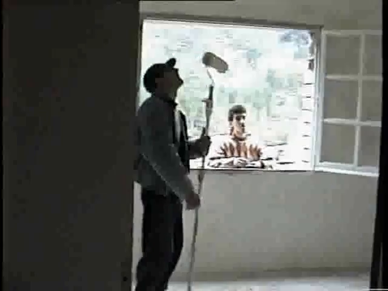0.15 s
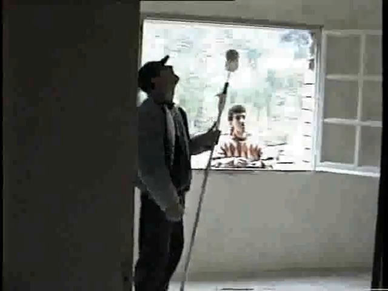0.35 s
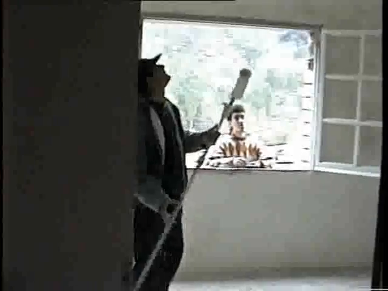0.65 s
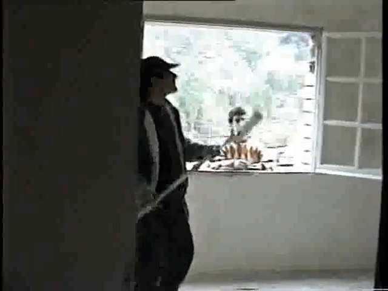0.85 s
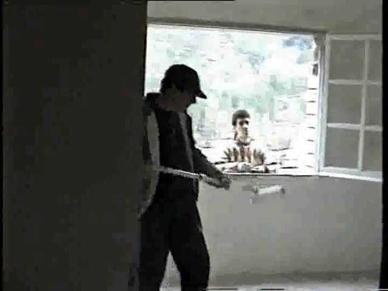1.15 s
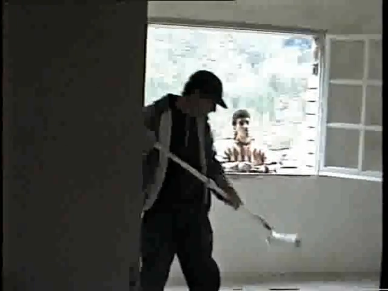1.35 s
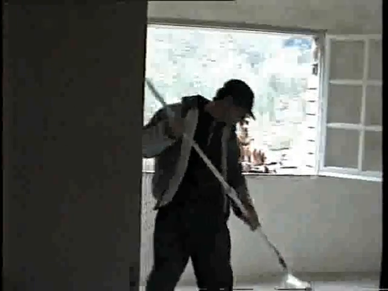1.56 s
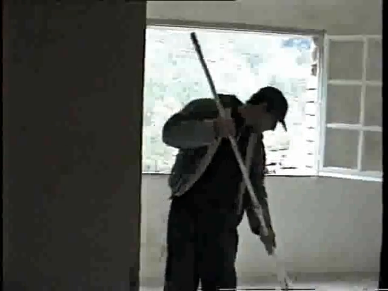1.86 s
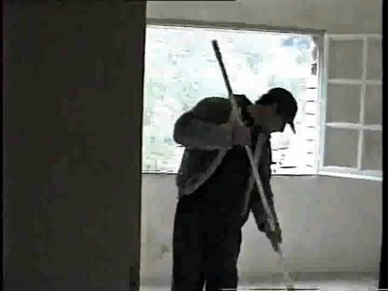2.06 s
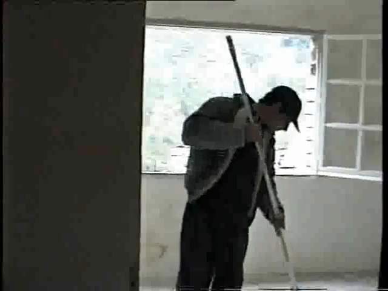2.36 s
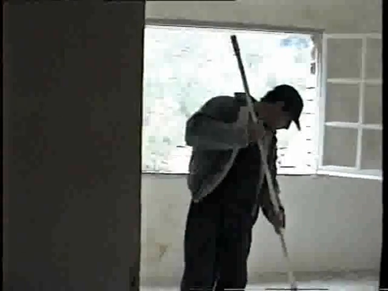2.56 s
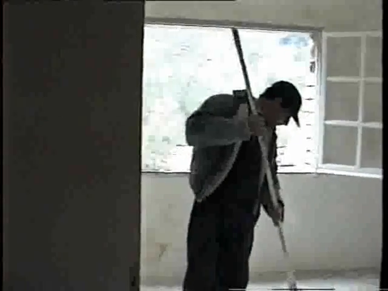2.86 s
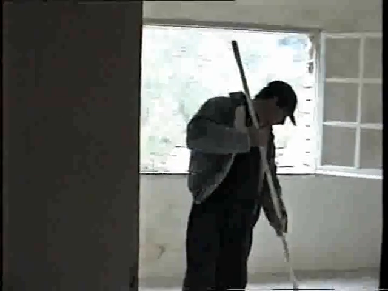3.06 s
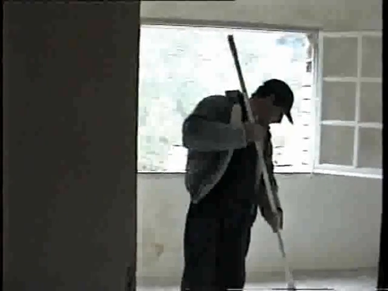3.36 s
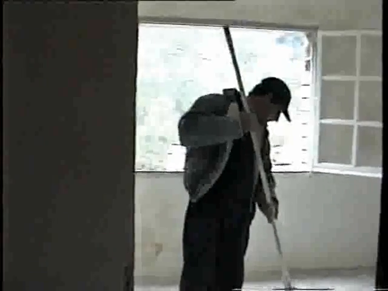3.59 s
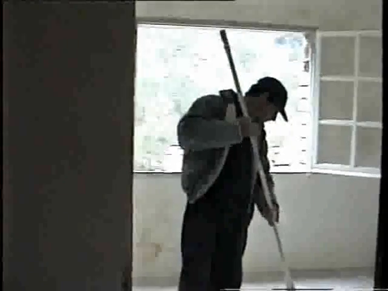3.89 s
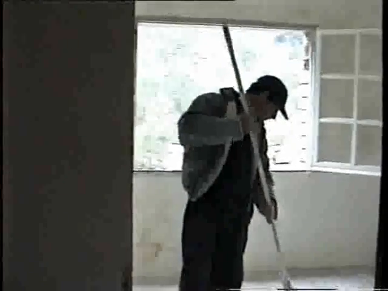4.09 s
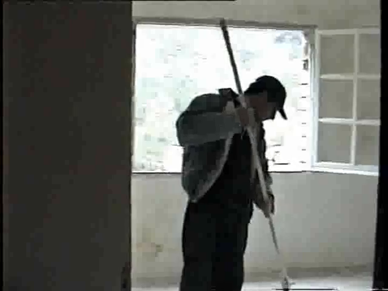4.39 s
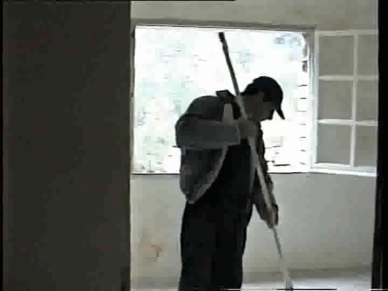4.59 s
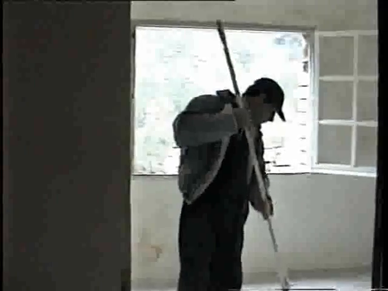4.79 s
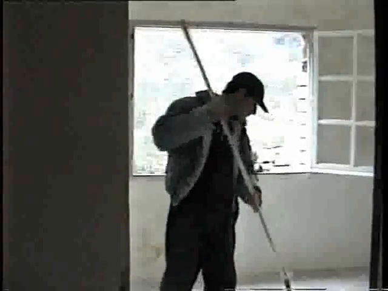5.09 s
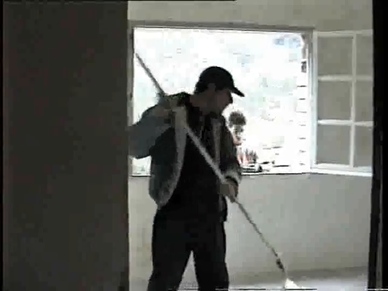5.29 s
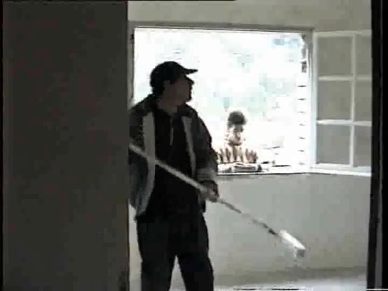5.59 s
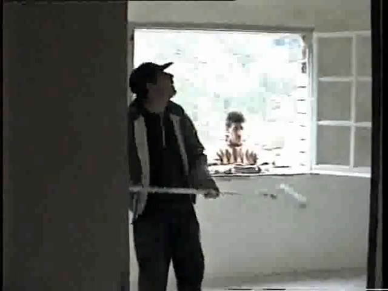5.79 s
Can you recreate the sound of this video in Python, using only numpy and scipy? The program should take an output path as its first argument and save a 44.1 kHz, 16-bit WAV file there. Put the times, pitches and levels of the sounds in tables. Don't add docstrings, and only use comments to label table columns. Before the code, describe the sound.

In a bare, echoing room, a wet paint roller knocks and scrapes a tub, then rolls in loud, hissing, drumming strokes.

```python
import sys
import numpy as np
from scipy import signal
from scipy.fft import rfft, irfft, next_fast_len
from scipy.io import wavfile
from scipy.ndimage import uniform_filter1d, map_coordinates

SR = 44100
rng = np.random.default_rng(int(sys.argv[2]) if len(sys.argv) > 2 else 0)


def undo_db(level):
    steps = np.asarray(level, float) / 20
    return 10 ** steps


def inscribe(sig):
    pcm = np.round(np.clip(np.atleast_2d(sig).T, -1, 1) * 32767)
    wavfile.write(sys.argv[1], SR, pcm.astype(np.int16))


N = 261954

# (frequency [Hz], t60 [s])
ROOM_DECAY = [(150, 1.63), (500, 1.05), (1500, 0.9), (3000, 0.7), (6000, 0.51), (12000, 0.34)]


def unit(x):
    return x / np.sqrt(np.mean(x ** 2) + 1e-20)


def along(points, hz):
    f, v = np.transpose(points)
    return np.interp(np.log(hz + 1), np.log(f + 1), v)


def wobble(rate):
    knots = rng.standard_normal(int(N * rate / SR) + 4)
    return map_coordinates(knots, [np.arange(N) * rate / SR])


def filtered(x, response):
    m = next_fast_len(N + SR // 2)
    return irfft(rfft(x, m) * response(np.fft.rfftfreq(m, 1 / SR)), m)[..., :N]


def colour(points):
    return lambda hz: undo_db(along([(points[0][0] / 2, -120)] + points, hz))


def roller():
    # (frequency [Hz], level [dB per Hz])
    rumble_colour = [(60, -60), (130, -12), (180, -16), (235, -3), (330, -6.5), (420, -6.5), (600, -49.5)]
    scrape_colour = [(250, -138), (400, -2.5), (600, 1.5), (1000, 2), (1600, -1), (2200, -8), (3400, -15),
                     (4500, -30), (7000, -48)]
    paint_colour = [(1200, 2), (2200, 2), (3500, 1), (5000, 0.5), (8000, 1), (10500, -2.5), (12500, -8.5),
                    (14000, -16), (15000, -25)]
    thump, tub, fizz = effort(t60=[.15, .055, .05], rise=0.0042)
    tub = tub * undo_db(3.59 * wobble(30))
    ring = ringing()
    share = 1 / np.sqrt(1 + ring ** 2)
    scrape = tub * share * unit(filtered(grains(spread_db=2.0), colour(scrape_colour)))
    walls = tub * share * ring * unit(filtered(grains(spread_db=0.5), tub_modes))
    low = thump * undo_db(2.0 * wobble(14)) * unit(filtered(grains(spread_db=2.5), colour(rumble_colour)))
    threads = fizz * undo_db(2.84 * wobble(60)) * unit(filtered(grains(spread_db=2), colour(paint_colour)))
    hiss = 0.62 * scrape + 0.71 * threads
    drumming = 0.59 * scrape + 0.42 * threads + walls + low
    return hiss, drumming


def effort(t60, rise):
    # (start [s], length [s], tub at landing [dB], tub at lift [dB], paint fizz at full speed [dB])
    rolls = [
        (2.992, .33, -11, -9.5, -11),
        (3.749, .33, -25, -12.5, -12),
        (4.38, 0.3, -11.5, -10.5, -12),
        (5.15, .25, -17, -15, -10),
    ]
    # (start [s], length [s], tub at landing [dB], tub at lift [dB], fizz [dB])
    drags = [(0, .1, -18, -37, -60), (.72, .12, -39, -50, -53), (0.853, 0.076, -27.5, -28.5, -44),
             (.98, .2, -33.5, -32, -39.5), (1.3, 0.24, -36, -28, -41.5), (1.211, .13, -18, -30, -47),
             (1.492, 0.24, -20, -41.5, -27), (1.722, 0.32, -37, -43.5, -45), (2, .12, -31.5, -18, -32),
             (2.122, .26, -7, -12.5, -19), (2.408, 0.23, -22, -25, -45), (2.615, .25, -26, -32.5, -40.5),
             (5.666, 0.24, -8.5, -12, -14)]
    # (time [s], thump [dB], tub [dB], snap [dB])
    knocks = [(0.0, -6.5, -40.7, -1.5), (0.09, -13.5, -50.8, -69.7), (0.228, -39, -19, -20),
              (0.425, -24, -16, -40), (0.712, -36, -19, -30), (0.855, -26, -20, -32),
              (0.885, -21, -31, -68.6), (1.04, -28, -20, -34), (1.22, -25, -17, -43),
              (1.254, -27, -19, -44), (1.501, -11.5, -30, -13.5), (2.011, -19.5, -15, -25),
              (2.078, -34.6, -23, -70.0), (2.121, -68.0, 3, -1.5), (2.613, -18, -6, -15),
              (2.999, -25, -1, -11.5), (3.749, -70.0, -17.5, -49), (4.375, -30, -3.5, -8),
              (5.128, -18, 0.5, -11.5), (5.187, -24, 2.5, -8.5), (1.14, -17, -33, -50),
              (1.33, -18.5, -40, -50), (2.43, -21.5, -40, -60), (5.646, -40, -3.5, -45),
              (5.674, -69.9, -12, -2)]
    power = np.zeros((3, N))
    for row in rolls:
        softer_db = max(row[3] - row[2], 0)
        late, tub, fizz = stroke(row, peak=0.59, start_db=16 + 1.24 * softer_db, end_db=13.5,
                                 sag_db=9, lag=0.19)
        add(power, row[0], np.array([undo_db(-13.5) * late, tub, fizz]))
    for row in drags:
        _, tub, fizz = stroke(row, peak=0.2, start_db=5, end_db=19.5, sag_db=0, lag=0)
        add(power, row[0], np.array([undo_db(-20.5) * tub, tub, fizz]))
    t = np.arange(SR // 4) / SR
    burst = undo_db(-60 * t / np.array(t60)[:, None]) * (1 - np.exp(-t / rise))
    for s, *dbs in knocks:
        add(power, s, undo_db(np.array(dbs)[:, None]) * burst)
    return np.sqrt(power)


def stroke(row, peak, start_db, end_db, sag_db, lag):
    attack_s, lift_db_per_s, trail_s = 0.0091, 325, 0.25
    _, length, land_db, lift_db, fizz_db = row
    t = np.arange(round((length + trail_s) * SR)) / SR
    u = np.clip(t / length, 0, 1)
    gate = np.clip(t / attack_s, 0, 1) * undo_db(-lift_db_per_s * np.maximum(t - length, 0))

    def swell(p):
        rising = -start_db * (1 - u / p) ** 2
        falling = -end_db * ((u - p) / (1 - p)) ** 2
        return np.where(u < p, rising, falling)

    tub = land_db + (lift_db - land_db) * u - sag_db * np.sin(np.pi * u) ** 2
    return gate * undo_db([lift_db + swell(peak + lag), tub, fizz_db + swell(peak)])


def add(power, s, envelopes):
    spot = power[:, max(round(s * SR), 0):][:, :envelopes.shape[1]]
    spot += envelopes[:, :spot.shape[1]] ** 2


def ringing():
    touch_s, soak_s = 1.15, 1.95
    away_db, dry_db, wet_db, damp_db_per_s = -9, 0.5, -8.5, 7
    t = np.arange(N) / SR
    soaked = np.maximum(dry_db - damp_db_per_s * np.maximum(t - soak_s, 0), wet_db)
    return undo_db(away_db + (soaked - away_db) * np.clip((t - touch_s) / 0.11, 0, 1))


def tub_modes(f):
    # (centre [Hz], width [Hz], level [dB])
    modes = [(459.5, 24.6, 7), (800, 86, 2), (1008, 157, 1.5), (1127, 75, -8), (1537, 15, 6),
             (2372, 47, -4.5), (3250, 230, -14)]
    total = 0
    for k, (centre, width, db) in enumerate(modes):
        damping = 1j * f * width
        total = total + (-1) ** k * undo_db(db) * damping / (centre * centre - f * f + damping)
    return total


def grains(spread_db):
    return rng.standard_normal(N) * undo_db(spread_db * rng.exponential(size=N))


def notes():
    # (time [s], frequency [Hz], level [dB], t60 [s])
    struck = [(0.028, 245, -10, 0.26), (0.0, 200, -11.5, 0.31), (0.079, 269, -6.5, 0.066),
              (1.26, 610, -16, 0.13), (2.14, 1020, 0.5, 0.1), (2.2, 1535, -8, 0.35),
              (.228, 2000, -16.5, 0.029), (.228, 2000, -24, 0.044), (.858, 790, -23, 0.092),
              (.856, 500, -20, 0.089), (.885, 438, -10.5, 0.058), (1.24, 1570, -15, 0.12),
              (1.23, 430, -19, 0.63), (1.25, 2475, -22.5, 0.082), (1.5, 1037, -14, 0.074),
              (1.55, 678, -18.5, 0.15), (2.08, 460, -16, 0.12), (2.39, 131, -24, 0.22),
              (3.02, 960, -11, 0.22), (3.301, 936, -12, 0.24), (3.3, 570, -9, 0.097),
              (4.39, 500, -13, 0.28), (4.63, 860, -13.5, 0.43), (4.63, 1324, -10.5, 0.18),
              (5.21, 530.3, -4.5, 0.14), (5.14, 630, -14, 0.11), (5.19, 790, -9.5, 0.093),
              (5.33, 980, -8, 0.17)]
    out, t = np.zeros(N + SR), np.arange(SR // 2) / SR
    for s, hz, db, t60 in struck:
        phase = 2 * np.pi * hz * t + np.cumsum(rng.normal(0, 0.047, len(t)))
        envelope = undo_db(db - 60 * t / t60) * (1 - np.exp(-t / 0.0019))
        out[max(round(s * SR), 0):][:len(t)] += envelope * np.sin(phase)
    return out[:N]


def clank():
    # (frequency [Hz], level [dB], t60 [s])
    steel = [(1800, -6, 0.73), (1980, -2.5, 1), (2482, -10, 1), (3180, -3.5, 0.57), (4170, -5, 0.6),
             (4840, -7, 0.5), (5100, -6, 0.37), (5850, -3, 0.45), (8050, -5, 0.35), (7130, -8, 0.3),
             (8920, -10, 0.28), (10070, -28, .2), (11000, -18, .3), (11400, -14, .25)]
    # (time [s], level [dB], tilt [dB per kHz])
    clanks = [
        (0, -24.5, 0.5),
        (.228, -37, 0),
        (1.254, -36, -1.5),
    ]
    out, t = np.zeros(N + SR), np.arange(SR) / SR
    for s, db, tilt_db in clanks:
        for hz, level_db, t60 in steel:
            waver = np.cumsum(rng.normal(0, 0.077, len(t)))
            fading = undo_db(db + level_db + tilt_db * hz / 1000 - 60 * t / t60)
            out[max(round(s * SR), 0):][:len(t)] += fading * np.sin(2 * np.pi * hz * t + waver)
    return out[:N]


def room(x, gap=.006, count=24):
    hz, t, z = signal.stft(rng.standard_normal((count + 1, 3 * SR // 2)), SR, nperseg=256)
    t60 = along(ROOM_DECAY, hz)[:, None]
    tails = signal.istft(z * undo_db(-60 * t / t60) / np.sqrt(t60), SR, nperseg=256)[1]
    tails = np.pad(tails / np.linalg.norm(tails[0]), ((0, 0), (round(gap * SR), 0)))
    step = N // count + 1
    fade = np.sin(np.pi * np.arange(2 * step) / (2 * step))
    padded, out = np.pad(x, (step, 2 * step)), np.zeros(N + 3 * step + 2 * SR)
    for k, tail in enumerate(tails):
        echo = signal.fftconvolve(padded[k * step:][:2 * step] * fade, tail)
        out[k * step:][:len(echo)] += echo
    return out[step:step + N]


def wash(x, gap=.008):
    hz, t, z = signal.stft(x, SR, nperseg=256)
    keeps = undo_db(-120 * t[1] / along(ROOM_DECAY, hz))
    energy = [signal.lfilter([1 - keep], [1, -keep], row) for keep, row in zip(keeps, np.abs(z) ** 2)]
    fresh = signal.stft(unit(rng.standard_normal(N)), SR, nperseg=256)[2]
    fresh = fresh / np.sqrt(np.mean(np.abs(fresh) ** 2))
    echo = signal.istft(np.sqrt(energy) * fresh, SR, nperseg=256)[1]
    return np.pad(echo, (round(gap * SR), 0))[:N]


def air():
    # (frequency [Hz], level [dB per Hz])
    air_colour = [(25, 11), (60, 2), (95, -9), (125, 6), (160, -16), (240, -5.5), (500, 5), (1200, -6.5),
                  (2500, -8.5), (4000, -17), (9000, -21.5), (14500, -36)]
    sway = undo_db(-38.5 + 2.7 * wobble(4.15))
    return sway * unit(filtered(rng.standard_normal(N), colour(air_colour)))


def scene():
    hiss, drumming = roller()
    tones = notes()
    direct = undo_db(-10.0) * (hiss + drumming) + undo_db(-2.5) * tones
    echoes = undo_db(-1.96) * (wash(hiss) + room(drumming + tones))
    mono = direct + echoes + clank() + air()
    return np.array([mono, mono])


def gain_control(x, knee_db, treble, memory):
    sensed = x ** 2 + treble * np.diff(x, prepend=0) ** 2
    keep = np.exp(-1 / (memory * SR))
    level = signal.lfilter([1 - keep], [1, -keep], sensed)
    return x / (1 + level / undo_db(2 * knee_db)) ** 0.18


def treble_muting(x, error_db, ragged_db):
    # (frequency [Hz], level under the loudest cell of the moment [dB])
    muted = [(3000, -83), (7000, -57.5), (9000, -66), (11500, -65), (13500, -47), (15000, -34)]
    hz, _, z = signal.stft(x, SR, nperseg=1024)
    band = uniform_filter1d(np.abs(z) ** 2, size=5, axis=0)
    patches = uniform_filter1d(rng.standard_normal(z.shape), size=6, axis=0)
    ragged = ragged_db * unit(uniform_filter1d(patches, size=4, axis=1))
    bar = undo_db(2 * (along(muted, hz)[:, None] + ragged)) * band.max(axis=0) ** 0.67
    kept = z * (band > bar)
    error = undo_db(error_db) * kept * rng.standard_normal(z.shape) * (hz < 1700)[:, None]
    return signal.istft(np.array([kept + error, kept - error]), SR, nperseg=1024)[1][:, :N]


def stereo_lean(hz):
    lean_db = along([(60, .6), (500, 0.092), (1500, 0.038), (2500, 0.16)], hz)
    return undo_db(np.array([[.5], [-.5]]) * lean_db) * (hz < 15030)


def band_limit(x):
    return signal.sosfilt(signal.butter(12, 15030, fs=SR, output="sos"), x)


def record(dry):
    x = gain_control(dry[0], knee_db=-6.0, treble=0.86, memory=0.029)
    x = x / (1 + np.abs(x / .85) ** 5) ** (1 / 5)
    x = filtered(x, lambda hz: (hz / 110) ** 2 / (1 + (hz / 110) ** 2))
    bent = x ** 2 + 3 * np.diff(x, prepend=0) ** 2
    x = x + undo_db(-8.0) * filtered(bent, lambda hz: (hz > 18) / (1 + (hz / 60) ** 2))
    x = filtered(treble_muting(x, error_db=-32.5, ragged_db=10), stereo_lean)
    mix = np.clip(1.27 * x, -1, 1)
    return band_limit(mix)


dry = scene()
out = record(dry)
inscribe(out)
```